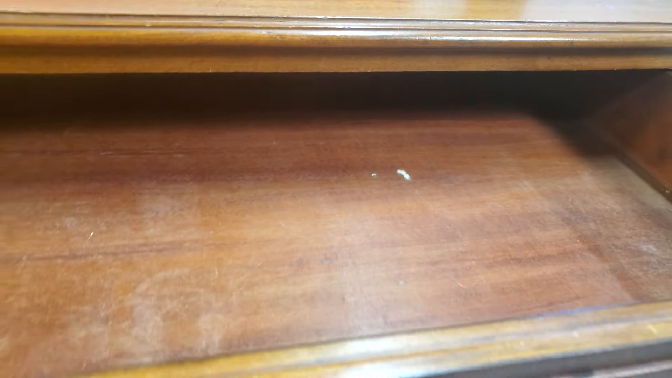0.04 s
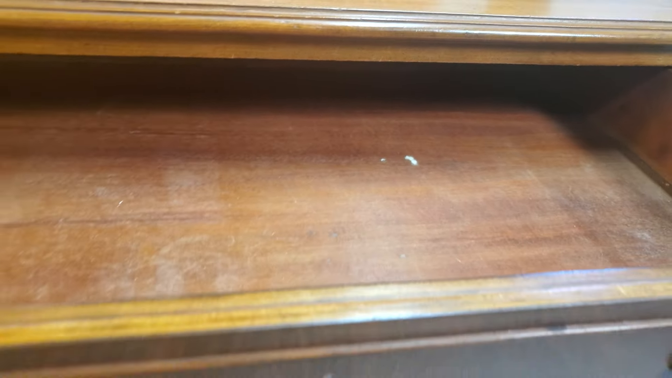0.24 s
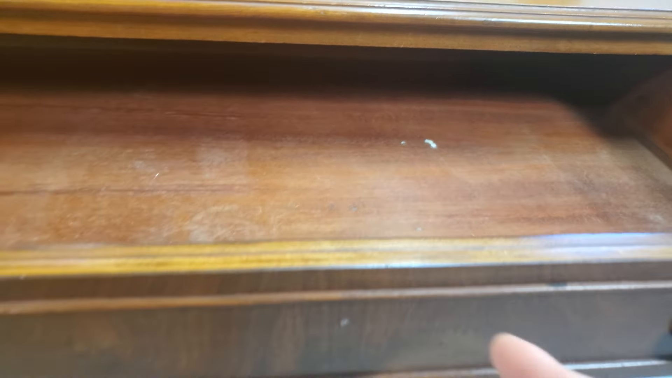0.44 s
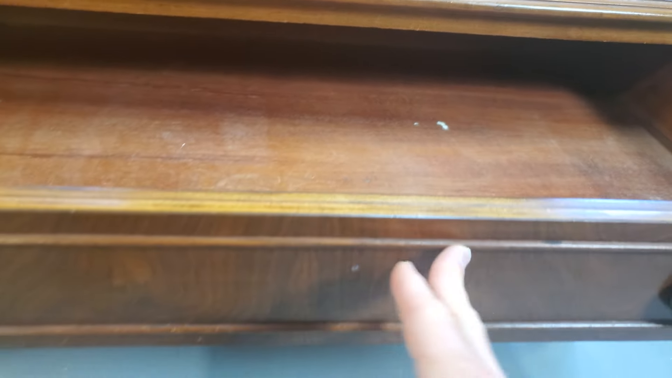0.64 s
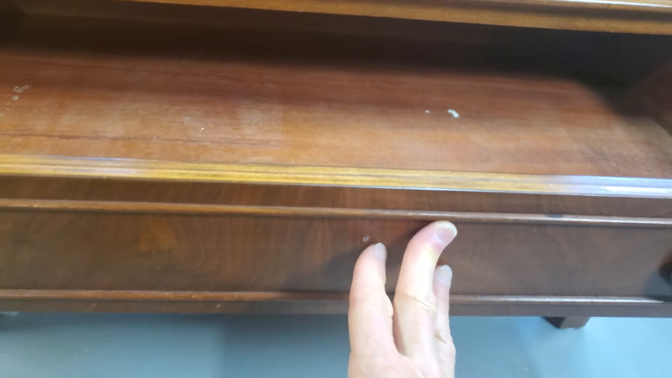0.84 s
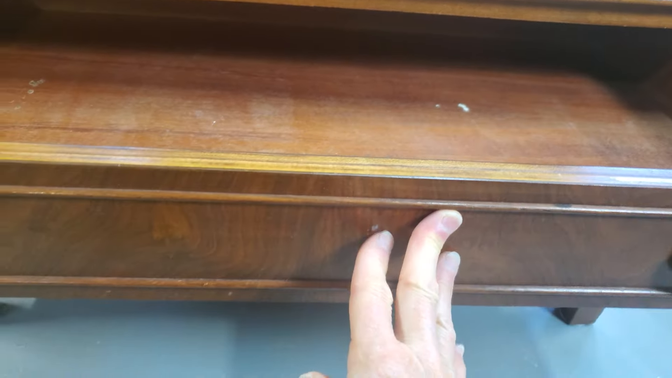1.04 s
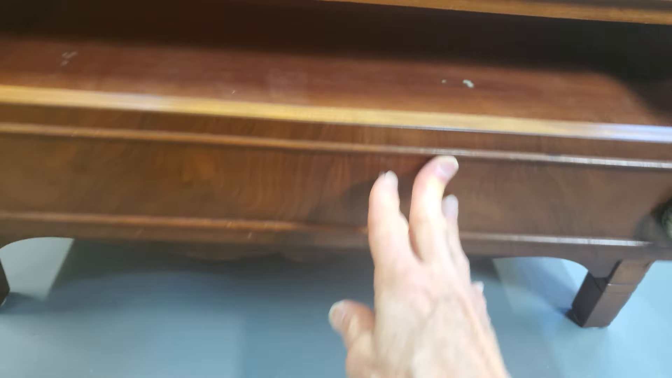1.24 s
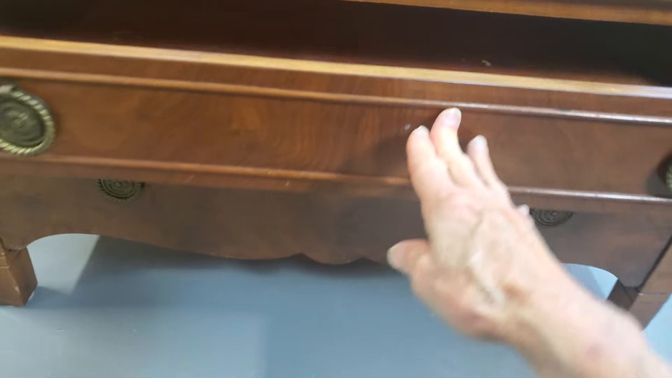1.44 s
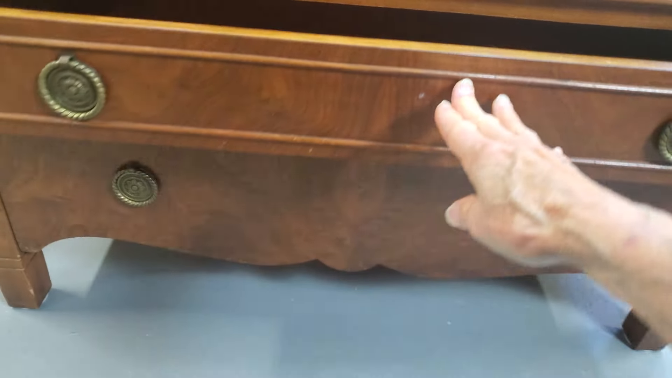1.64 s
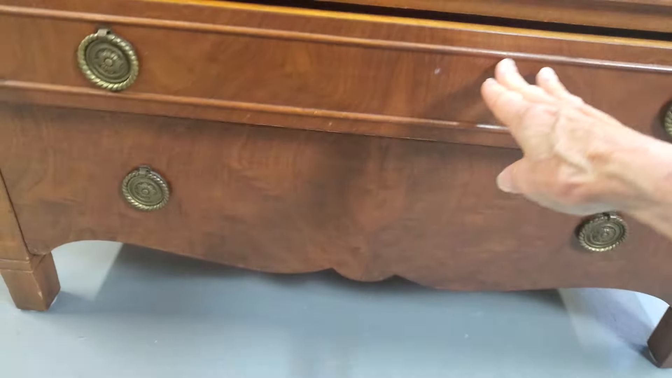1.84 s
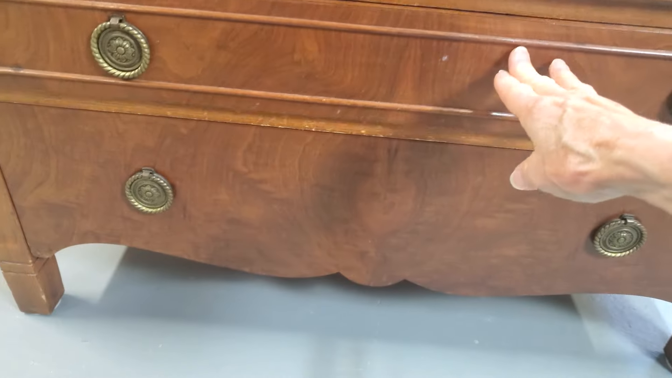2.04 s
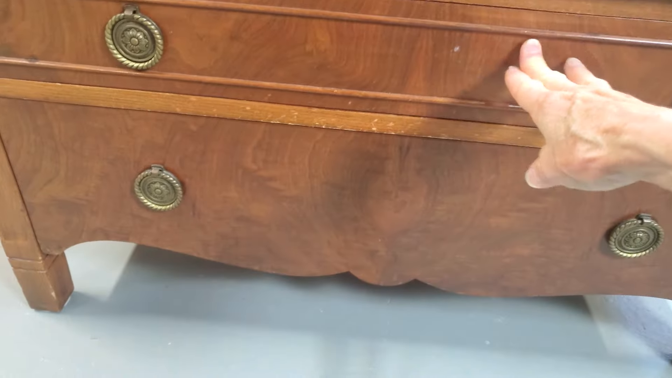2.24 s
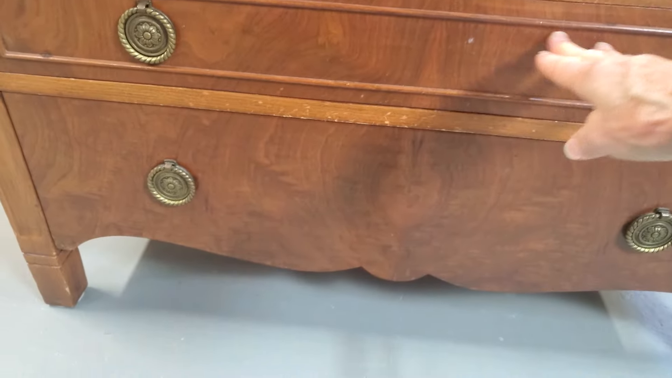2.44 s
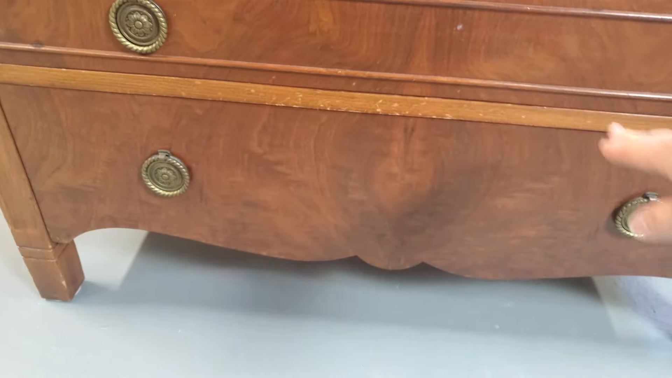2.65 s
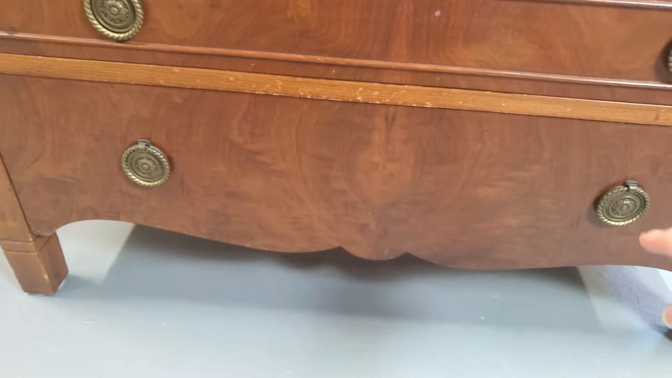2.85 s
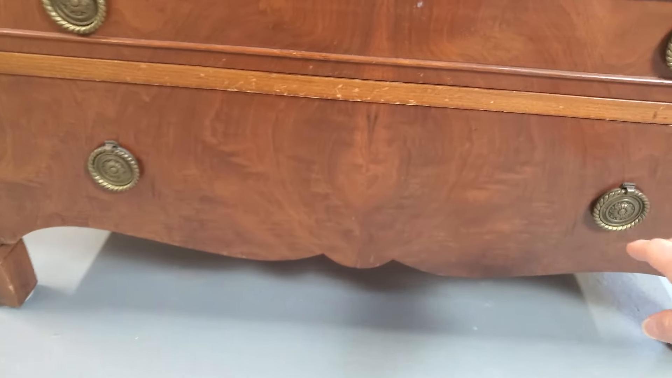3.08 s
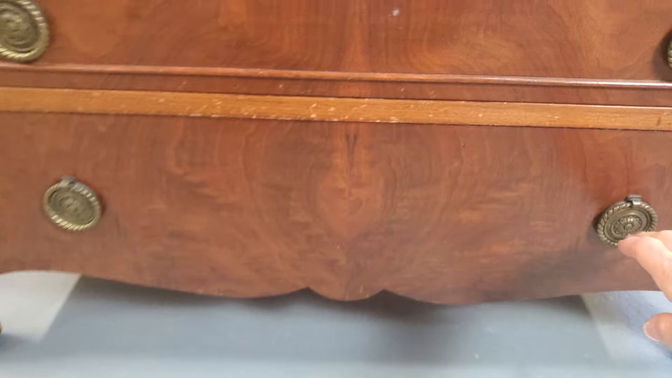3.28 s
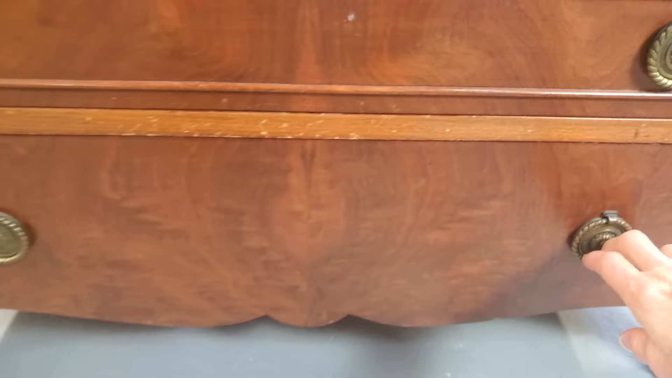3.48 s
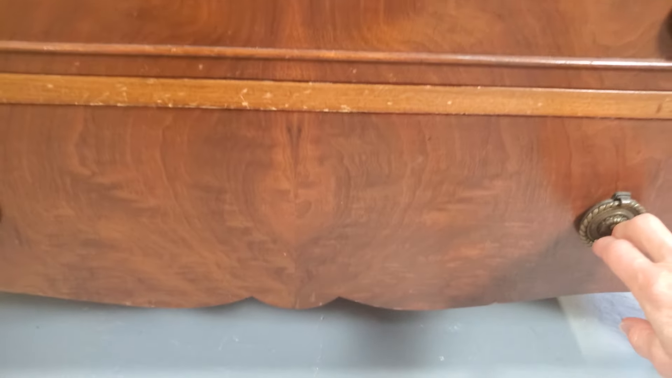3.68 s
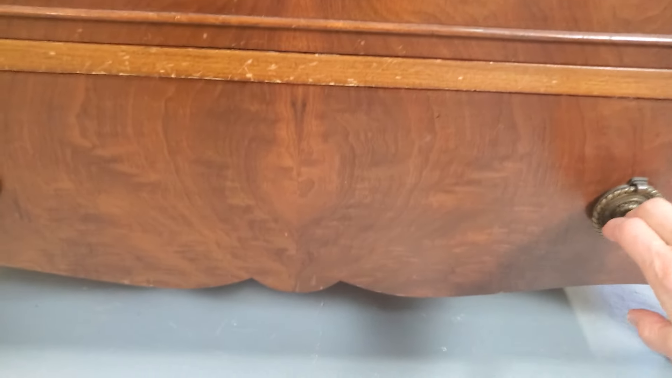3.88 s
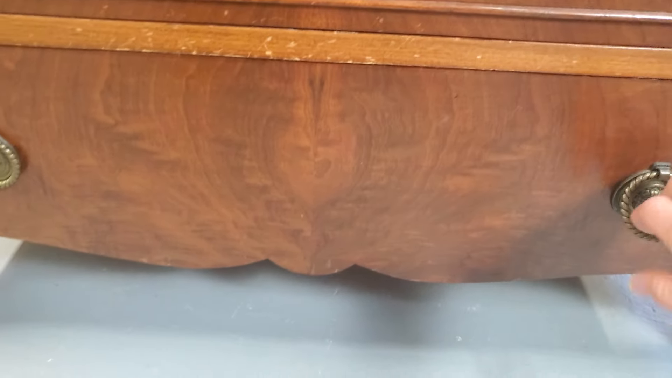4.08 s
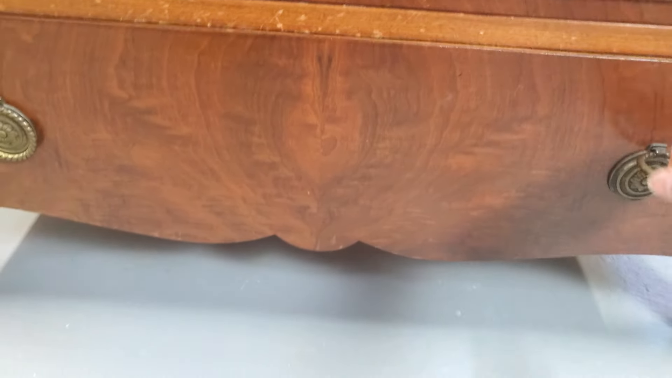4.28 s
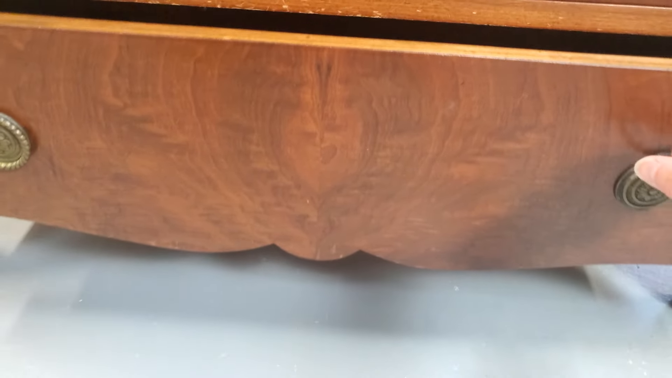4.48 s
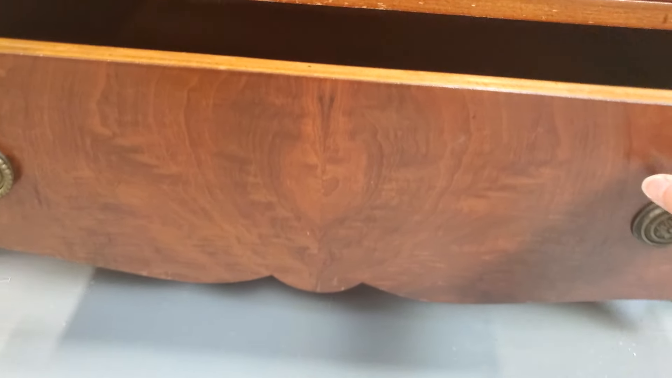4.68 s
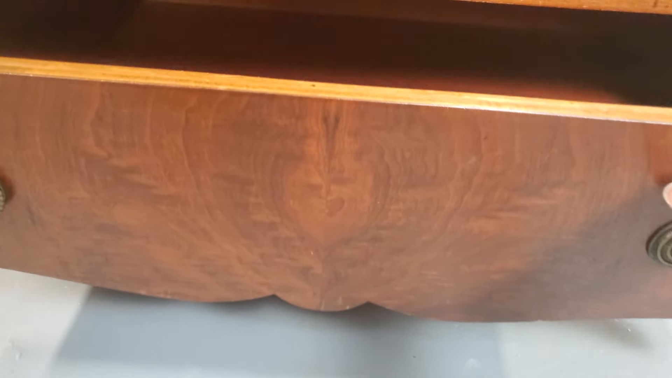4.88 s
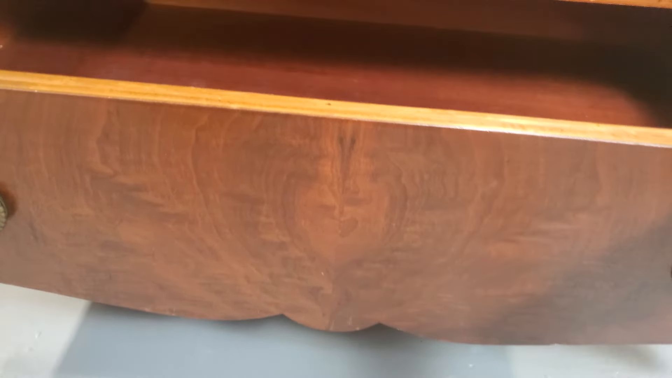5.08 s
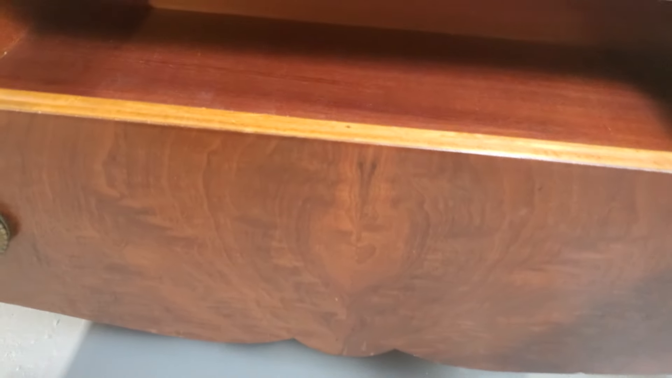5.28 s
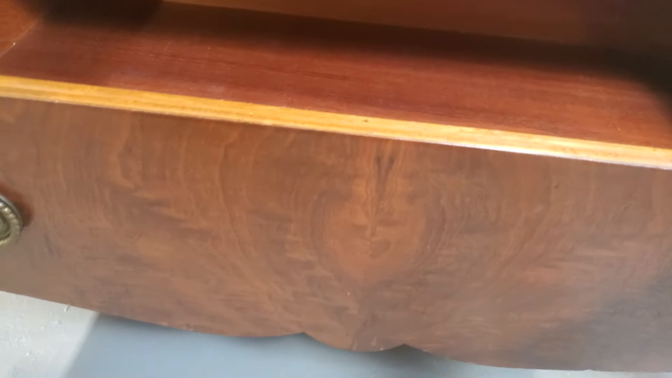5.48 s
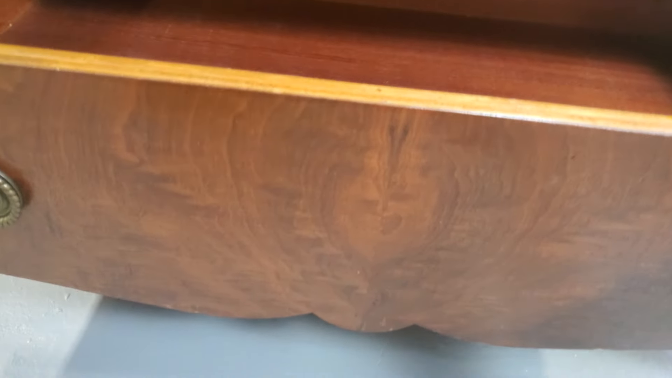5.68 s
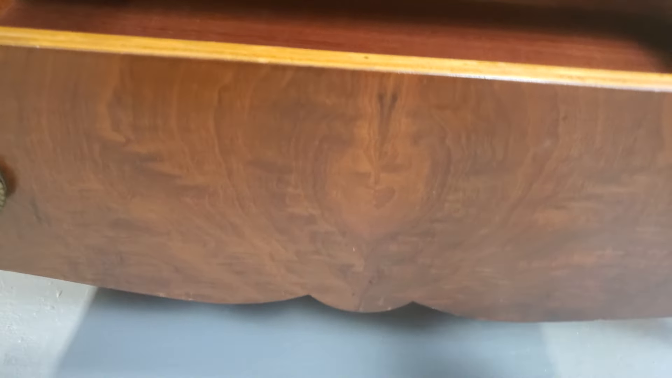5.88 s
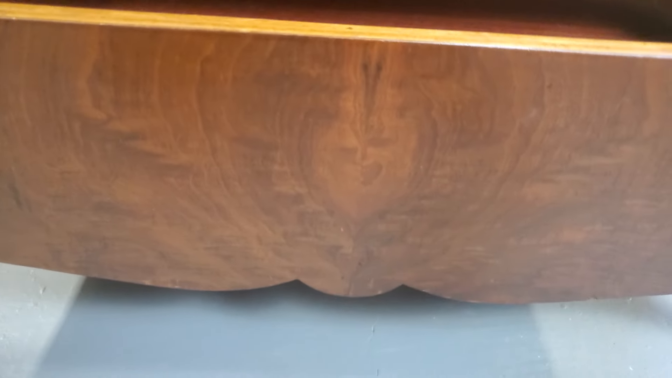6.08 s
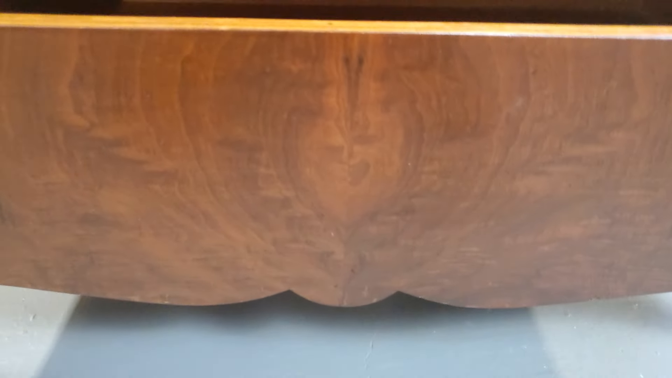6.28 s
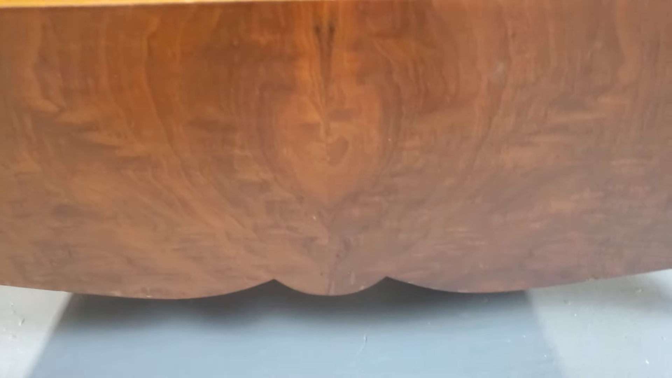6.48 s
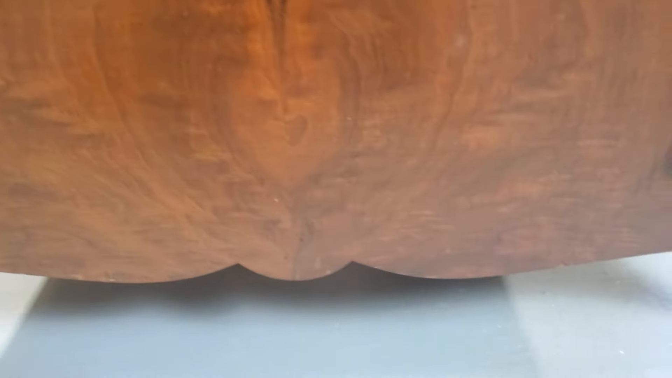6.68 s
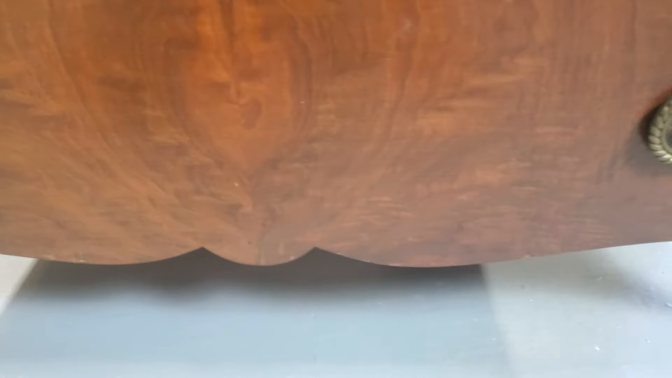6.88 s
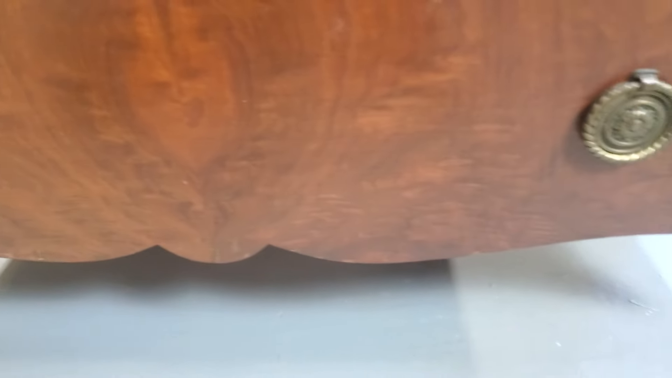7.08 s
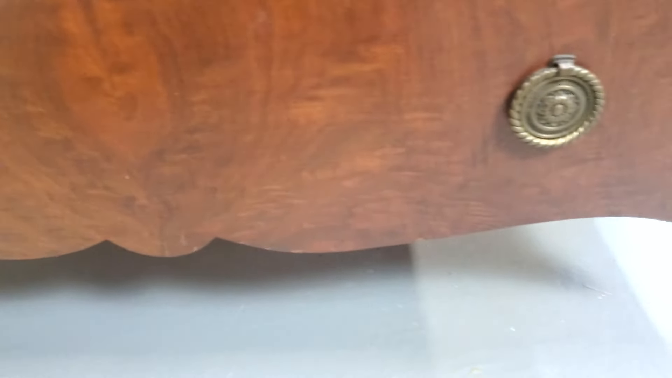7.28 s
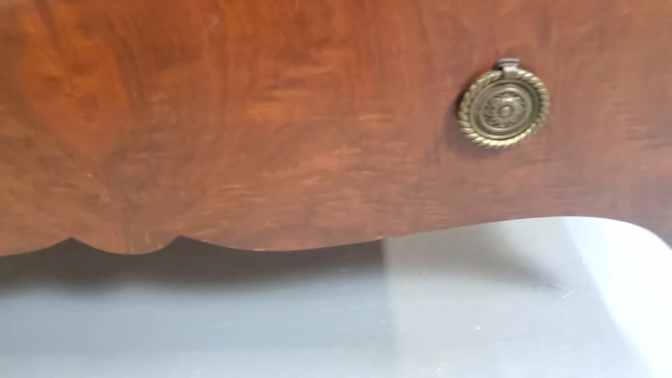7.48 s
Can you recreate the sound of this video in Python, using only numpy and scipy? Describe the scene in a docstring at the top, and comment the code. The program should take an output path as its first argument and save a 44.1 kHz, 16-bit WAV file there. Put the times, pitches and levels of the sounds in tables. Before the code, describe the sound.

Close by in a quiet room, an old wooden drawer scrapes inward with hollow, booming knocks and bright clacks of brass ring pulls. After a short lull, fingers tick against a lower pull, that drawer jerks and rumbles out, and loose fittings clatter sharply. Soft cloth and shoe scuffs and a dull heel thump follow.

```python
"""Faint room tone comes first, then small wooden shudders and light clacks as a drawer of an old chest is pushed in.
The runners slip and shake the hollow carcass, while dry wood hisses on wood and brass ring pulls clack on plates.
Fingers then feel for the lower pull, that drawer is pulled out, and loose fittings clatter hard.
Near the end, clothes and shoes rub and a soft heel thumps. Wood and brass are ringing modes driven by clicks;
rubbing is coloured grains. All is heard from close by in a quiet room."""
import sys
import numpy as np
from scipy import signal
from scipy.fft import rfft, irfft, next_fast_len
from scipy.io import wavfile

SR = 44100
rng = np.random.default_rng(int(sys.argv[2]) if len(sys.argv) > 2 else 0)


def unload_wav(signal):
    """Save mono or channel-first audio to the path in sys.argv[1] as 16-bit WAV at rate SR, clipped to [-1, 1]."""
    wavfile.write(
        sys.argv[1],
        SR,
        np.round(np.clip(np.atleast_2d(signal).T, -1, 1) * 32767).astype(np.int16),
    )


N = 332073

# The two strokes, push in and pull out, one list each:
# time_s, boom_db, panels_db, drone_db (drawer bottom), hiss_db, hiss_top_db
STROKES = [
    [(1.118, -43, -40, -50, -45, -56), (1.2, -44, -47.5, -61, -48.5, -47.5),
     (1.26, -39.5, -42, -57, -41, -45), (1.37, -35, -44.5, -54, -43, -45),
     (1.43, -42, -45.5, -51, -45, -56), (1.62, -21, -44.5, -57, -45, -51),
     (1.75, -23, -37, -35.5, -41, -57.5), (1.88, -37, -38.5, -47, -46, -60),
     (1.94, -32.5, -43, -55, -48.5, -63), (1.97, -40.5, -45, -45, -38, -57),
     (2.03, -40, -48.5, -46.5, -45, -60), (2.12, -48.5, -60, -63, -57, -59.5),
     (2.25, -39, -55.5, -57, -60.5, -73.5), (2.47, -74.5, -77.5, -99, -83, -97)],
    [(4.3, -32, -54, -47, -56, -75), (4.33, -35, -44, -42, -46.5, -65), (4.37, -53, -50, -54, -54, -63),
     (4.57, -37, -55, -53, -51, -60), (4.65, -33, -48.5, -50, -45.5, -56),
     (4.76, -30.5, -45.5, -31.5, -45, -56.5), (4.91, -42.5, -73, -61.5, -56.5, -64.5),
     (4.97, -24.5, -57, -45, -44.5, -58.5), (5.03, -39, -64, -48, -45, -56.5),
     (5.16, -36.5, -56, -50, -48, -59), (5.39, -43, -58, -50.5, -48.5, -59),
     (5.45, -42.5, -64, -58.5, -56, -66), (5.52, -52, -78, -80, -80.5, -81)],
]
# Jolts that leave the chest shuddering: start_s, boom_db, panels_db, drone_db, t60_s (time to fall 60 dB)
JOLTS = [(0.699, -58.5, -77.5, -89, 1.4), (0.994, -50, -43.5, -58, 0.2), (1.12, -38.5, -35.5, -52.5, 0.25),
         (1.464, -12, -22.5, -29.5, 0.35), (1.577, -20.5, -35.5, -35.5, 0.4), (1.64, -31, -44, -39, 0.26),
         (1.931, -33, -50, -59, 0.42), (2.14, -41.5, -65, -60, 0.4), (2.444, -74.5, -69, -92, 0.27),
         (2.513, -43.5, -82.5, -75, 0.38), (3.377, -38, -80, -70, 1.05), (3.419, -36.5, -49.5, -61, 0.64),
         (3.526, -37, -51.5, -55.5, 0.4), (3.668, -48, -54, -56, 0.21), (3.774, -46, -58, -61, 0.36),
         (3.906, -45.5, -67.5, -75.5, 0.67), (3.8, -60, -58.5, -69.5, 0.38), (4.058, -68, -82, -60.5, 0.22),
         (4.1, -58, -73, -72, 1.9), (4.315, -21, -50.5, -41.5, 0.45), (4.665, -35.5, -47, -54, 0.36),
         (4.957, -14.5, -39.5, -32.5, 0.29), (5.498, -36, -72.5, -68.5, .3),
         (5.595, -41.5, -58, -60.5, 0.42), (5.74, -55, -52.5, -57.5, 1.8), (5.9, -64, -55, -52, 0.35),
         (5.941, -40.5, -54.5, -69, 0.55)]
# Ringing modes of the hollow carcass: pitch_hz, level_db (relative), t60_s
CARCASS = [(62, -12.5, 0.15), (81.8, 2, 0.15), (106, 4.5, 0.081), (166.5, -1, 0.14), (217.2, -2.5, 0.084),
           (282.2, -5.5, 0.13), (339.5, -13, 0.36)]
# Ringing modes of the drawer panels: pitch_hz, level_db (relative), t60_s
PANELS = [(406.5, -0.5, 0.094), (488, -6.5, 0.036), (541, -6, 0.06), (765, -5.5, 0.044), (870, -7.5, 0.061),
          (982, -6.5, 0.05), (1087, -8.5, 0.066), (1425, -8.5, 0.01), (1960, -13, 0.014)]
# Ringing modes of the thin drawer bottom: pitch_hz, level_db (relative), t60_s
BOTTOM = [(567, -0.5, 0.053), (640.5, -0.5, 0.057), (697, -3.5, 0.039)]
SLIPS_PER_S, JOLT_RISE_S = 250, 0.004
RADIATES_HZ = 57.65  # the chest moves little air below this

# Colour of dry wood rubbing: pitch_hz, level_db (per Hz, relative)
HISS = [(410, -31), (700, -4), (842, -8), (1320, -9), (1470, -5), (1990, -9.5), (2360, -6), (6200, -11.5),
        (7970, -29), (9600, -27.5), (15200, -32.5), (15900, -25.5), (16500, -43.5)]
# Fingers feeling for the lower pull: time_s, hiss_db, top_db
FINGERS = [(3.1, -95, -98), (3.3, -85, -86), (3.39, -68, -76), (3.45, -58, -72), (3.55, -58, -50),
           (3.59, -56, -58.5), (3.79, -63.5, -65.5), (3.88, -64.5, -72.5), (3.97, -78.5, -87.5),
           (4.19, -74, -75.5), (4.28, -66.5, -72)]
# Cloth and shoes scuffing: peak_s, hiss_db, top_db, swell_s, fade_s
SCUFFS = [(2.83, -81, -79, 0.085, 0.24), (6.17, -80, -73, 0.056, .15), (6.37, -51, -55.5, 0.31, 0.11),
          (6.62, -50, -53.5, 0.11, 0.075), (6.5, -71, -73, 0.022, 0.054), (6.825, -57, -59.5, 0.032, 0.096),
          (6.865, -58, -66.5, 0.12, 0.087), (6.91, -72, -86.5, 0.019, 0.045), (6.95, -74, -88, 0.046, 0.15),
          (7.271, -70, -79.5, 0.037, 0.44), (7.359, -71.5, -81.5, 0.14, 0.16), (7.5, -76.5, -95.5, .05, .1)]
GRAINS_PER_S, SCUFF_EDGE_DB = 5500, 30

# Wood meeting wood: start_s, peak_db
KNOCKS = [(0.879, -67), (0.994, -43), (1.121, -41), (1.339, -50), (1.472, -9), (1.58, -6.5), (1.719, -8),
          (1.785, -14.5), (2.449, -66.5), (2.515, -54.5), (3.384, -44), (3.782, -51), (3.91, -46),
          (4.325, -19.5), (4.649, -26), (4.96, -17.5), (5.505, -51)]
KNOCK_HARD_HZ = 1100  # a harder blow has a shorter push, about 1 / this

# Ring pulls of the upper drawer on their plates:
# start_s, mid_db, top_db, body_db, rattle_t60_s, ring_db (relative to mid_db), pitch_hz (rung most)
UPPER_CLACKS = [(0.862, -58, -61, -86, 0.16, -21, 6000), (0.8863, -55.5, -64, -83, 0.52, -28, 6000),
                (1.3604, -11.5, -25.5, -26, 0.14, -0.5, 5900), (1.373, -37, -27, -38, 0.21, -8, 11000),
                (1.5507, -14.5, -28.5, -31, 0.082, -12, 9000), (1.623, -28, -31.5, -47, 0.13, -13, 9000),
                (1.822, -30.5, -38.5, -34, 0.06, -18, 9000), (2.2503, -39, -39.5, -38, 0.053, -19.5, 6000),
                (2.2585, -22.5, -36, -48, 0.024, -5.5, 6000),
                (2.2747, -28.5, -60, -43.5, 0.082, -1.5, 2830), (2.779, -63, -80, -72.5, 0.052, -12, 4020),
                (2.8168, -51.5, -63.5, -76.5, 0.096, -15, 4000)]
# Loose fittings of the lower drawer clattering:
# start_s, mid_db, top_db, body_db, rattle_t60_s, ring_db (relative to mid_db), pitch_hz (rung most)
LOWER_CLACKS = [(5.594, -14, -36, -36.5, 0.15, -5, 3500), (5.733, -35, -62.5, -44, 0.052, 8.5, 1607),
                (5.764, -30, -60.5, -41.5, .08, 3.5, 3500), (5.779, -35.5, -61.5, -31.5, 0.28, -2, 1845),
                (5.857, -34, -61, -40, 0.13, -11, 2970), (5.891, -8.5, -27.5, -28.5, 0.022, -2, 2194),
                (5.901, -10.5, -23.5, -31.5, 0.44, -6, 2450), (6.059, -48, -70, -57, .08, -7.5, 2850),
                (6.075, -19.5, -43, -47, 0.036, -1.5, 2450)]
# Fingers ticking a held, damped pull: start_s, mid_db, top_db, body_db
HELD_CLACKS = [(3.381, -38.5, -65, -52), (3.408, -25, -56, -50), (3.4318, -16, -29.5, -38),
               (3.5193, -17.5, -39.5, -33), (3.5494, -48, -45, -45), (3.5986, -47, -58, -44),
               (3.6585, -46, -59, -44), (3.694, -42, -65, -48), (3.735, -60, -70, -51),
               (3.908, -43, -65.5, -61), (4.061, -58, -84.5, -58.5), (4.2893, -35.5, -62, -38.5),
               (4.3221, -25, -49.5, -51), (4.9627, -27, -49, -35), (6.314, -53, -70, -69),
               (6.908, -60, -73, -44), (7.247, -60.5, -77, -75)]
HELD_T60_S, HELD_RING_DB, HELD_PITCH_HZ = 0.083, -8, 3150
# Ringing modes of the upper ring pull: pitch_hz, level_db (relative), t60_s
UPPER_PULL = [(2810, -5.5, 0.09), (4070, -18, 0.082), (4680, -20.5, 0.042), (6605, -2, 0.053),
              (8470, -10.5, 0.14), (9100, -19.5, 0.047), (11140, -7, 0.081), (13800, -18.5, 0.16),
              (15360, -5.5, .05), (16500, -8, .15), (15300, -12.5, 0.14)]
# Ringing modes of the lower drawer's fittings: pitch_hz, level_db (relative), t60_s
LOWER_PULL = [(697, -8, 0.051), (800, -1.5, 0.099), (1110, -10.5, 0.082), (1690, -10.5, 0.12),
              (2200, -4, 0.078), (2528, 2, 0.027), (2765, -7, 0.055), (2860, -6, 0.055), (2935, -6, .055),
              (3380, -1.5, 0.04), (3777, -8, 0.04), (4850, -6, 0.041), (5230, -16.5, 0.055),
              (5796, -7.5, 0.068), (6260, -1, 0.15), (15320, -28.5, .08)]
# Colour of the crack and rattle: pitch_hz, level_db (per Hz, relative)
CRACK = [(180, -47.5), (300, -16), (717, -10), (1830, -9), (2060, -4.5), (2790, -6), (3090, -4.5),
         (5550, 0), (7890, -10), (12600, -12.5), (14200, -16), (15700, -8), (16500, -26.5)]

# A soft heel on the floor: start_s, level_db, pitch_hz, t60_s
HEEL = [(6.624, -40.5, 80.5, 0.033)]

# Balance of the treble, before the right side is shaded: time_s, left_minus_right_db
PLACE = [(0.0, 6), (0.9, 4), (2.0, 2), (2.3, 7), (3.4, 5), (4.399, 2), (5.5, 2.5), (5.799, 6.5),
         (6.8, -1.5), (7.53, 12)]
PORT_SPLIT_HZ, SHADE_HZ, SCATTER_T60_S, BASS_LEFT_DB = 910, 10000, 0.066, 1.0
ROOM_T60_S, WALL_CUT_HZ, ROOM_DB = 0.35, 10000, -19.5
# Colour of the room tone: pitch_hz, level_db (per Hz, relative)
QUIET = [(8.8, -64.5), (15, -39.5), (48, 0.5), (71, -1), (90, -15.5), (124, -3.5), (152, -25), (298, -21.5),
         (325, -29), (476, -26), (677, -40), (1630, -40), (2120, -35), (2390, -44.5), (7000, -45),
         (8000, -51), (16500, -47.5)]
QUIET_DB = -65
# Mains hum, before a small trim and drift: pitch_hz, level_db
HUM = [(60, -88), (119, -79.5)]
MIC_LOW_HZ, CUTOFF_HZ = 58.1, 17150


def runners():
    """The carcass booms, the panels buzz and the drawer bottom drones under the slipping runners."""
    stroke_levels = in_time(STROKES)[:3]
    boom, panels, drone = np.sqrt(stroke_levels ** 2 + shudders())
    out = boom * shaken(CARCASS, SLIPS_PER_S)
    out += panels * shaken(PANELS, 3 * SLIPS_PER_S)
    return out + drone * shaken(BOTTOM, 3 * SLIPS_PER_S)


def shudders():
    """Power of boom, panels and drone after the jolts: a quick rise, then a steady fall, for up to 1 s."""
    power = np.zeros((3, N))
    for start_s, *levels_db, t60 in JOLTS:
        at = round(start_s * SR)
        t = np.arange(min(N - at, SR)) / SR
        rise = np.minimum(t / JOLT_RISE_S, 1)
        fall = amp(-60 * np.maximum(t - JOLT_RISE_S, 0) / t60)
        power[:, at:at + SR] += (amp(levels_db)[:, None] * rise * fall) ** 2
    return power


def shaken(modes, per_s):
    """Stick-slip jerks, dealt afresh to each mode, keep the wood ringing; unit rms."""
    out = np.zeros(N)
    for hz, db, t60 in modes:
        jerks = grains(per_s, spread_db=3.5)
        out += amp(db) * rms_one(ring(jerks, hz, t60))
    return rms_one(out)


def rubbing():
    """Dense fibre grains under slightly flickering pressure; a wide source, so two separate draws."""
    power = in_time(STROKES)[3:] ** 2 + in_time([FINGERS]) ** 2 + scuffs()
    hiss, bright = np.sqrt(power)
    fibres = np.array([grains(GRAINS_PER_S, spread_db=0.5) for side in range(2)])
    grit = colour(fibres, HISS)
    low = rms_one(band(grit, 900, 7300))
    top = rms_one(band(grit, 9000, 18500))
    flicker = amp(1.2 * drift(30))
    return flicker * (hiss * low + bright * top)


def scuffs():
    """Power of hiss and top as cloth and shoes rub: each scuff swells from and fades to an edge 30 dB down."""
    power, t = np.zeros((2, N)), np.arange(N) / SR
    for peak_s, hiss_db, top_db, swell_s, fade_s in SCUFFS:
        # 0 at the peak, 1 at either edge
        away = np.where(t < peak_s, (peak_s - t) / swell_s, (t - peak_s) / fade_s)
        levels_db = np.array([[hiss_db], [top_db]])
        power += amp(levels_db - SCUFF_EDGE_DB * np.minimum(away, 5)) ** 2
    return power


def knocks():
    """A blow is a short rounded push into all the wooden modes."""
    modes = CARCASS + [(hz, db - 7.5, t60) for hz, db, t60 in PANELS + BOTTOM]
    push = np.hanning(int(SR / KNOCK_HARD_HZ) + 3)
    force = np.zeros(SR // 2)
    force[:len(push)] = push / push.sum()
    out = np.zeros(N)
    for start_s, peak_db in KNOCKS:
        # each blow excites the modes a little differently
        strengths_db = rng.normal(0, 2, len(modes))
        blow = sum(amp(db + own_db) * ring(force, hz, t60)
                   for (hz, db, t60), own_db in zip(modes, strengths_db))
        at = round(start_s * SR)
        out[at:at + SR // 2] += (amp(peak_db) * blow / np.abs(blow).max())[:N - at]
    return out


def clacks(table, modes, chatter, crack_t60, tail_db, rise_s, off_pitch_db):
    """A crack and a dying rattle in three bands; the chattering contact drives the brass modes.

    chatter is the contact's t60 as a share of the rattle's t60. Modes weaken by off_pitch_db
    for each octave away from the pitch rung most."""
    grit = colour(grains(9000, spread_db=4.5), CRACK)
    edges_hz = [(1539, 6000), (9600, 18500), (411.6, 1710)]  # mid, top, body
    bands = [rms_one(band(grit, *edges)) for edges in edges_hz]
    touches = rms_one(grains(1500, spread_db=2.5))
    strengths_db = rng.normal(0, 2.0, (len(table), len(modes)))
    mode_hz = np.array(modes)[:, 0]
    t = np.arange(SR // 4) / SR  # each clack lasts at most a quarter second
    rise = 1 - np.exp(-t / rise_s)
    out = np.zeros(N + SR)
    for (start_s, mid_db, top_db, body_db, t60, ring_db, pitch_hz), own_db in zip(table, strengths_db):
        at = round(start_s * SR)
        span = slice(at, at + len(t))
        crack = amp(-60 * t / crack_t60)
        rattle = amp(tail_db - 60 * t / t60)
        for noise, db in zip(bands, (mid_db - 6.5, top_db, body_db)):
            out[span] += amp(db) * rise * (crack + rattle) * noise[span]
        force = rise * amp(-60 * t / (chatter * t60)) * touches[span]
        own_db = own_db - off_pitch_db * np.abs(np.log2(mode_hz / pitch_hz))
        brass = sum(amp(db + extra_db) * ring(force, hz, decay)
                    for (hz, db, decay), extra_db in zip(modes, own_db))
        out[span] += amp(mid_db + ring_db) * brass / np.abs(brass).max()
    return out[:N]


def heel():
    """One dull thump, a few cycles of a low sine that holds briefly and then dies away."""
    start_s, db, hz, t60 = HEEL[0]
    t = np.maximum(np.arange(N) / SR - start_s, 0)
    level_db = db - 60 * np.maximum(t - .02, 0) / t60
    return amp(level_db) * np.sin(2 * np.pi * hz * t)


def ports(pair):
    """Both microphone ports hear much the same bass; treble reaches the shaded right one duller and scattered."""
    time_s, pan_db = np.transpose(PLACE)
    pan_db = np.interp(np.arange(N) / SR, time_s, pan_db)
    bass = twice(pair, PORT_SPLIT_HZ, "low")
    treble = twice(pair, PORT_SPLIT_HZ, "high")
    # a short burst of fading noise smears the right treble
    t = np.arange(SR // 20) / SR
    scatter = rng.standard_normal(len(t)) * amp(-60 * t / SCATTER_T60_S)
    scatter /= np.sqrt(np.sum(scatter ** 2))
    shaded = signal.fftconvolve(treble[1], scatter)[:N]
    shaded = signal.sosfilt(signal.butter(1, SHADE_HZ, fs=SR, output="sos"), shaded)
    # keeps the treble power while it moves
    both = amp(0.15) * np.sqrt(4 / (1 + amp(-2 * pan_db)))
    treble = both * np.array([treble[0], shaded * amp(-0.5 - pan_db)])
    return bass * amp([[BASS_LEFT_DB / 2], [-BASS_LEFT_DB / 2]]) + treble


def room(x):
    """Echoes from six feedback delays a side with dull walls, worked out on a padded frequency grid."""
    size = next_fast_len(N + SR)
    w = 2 * np.pi * np.fft.rfftfreq(size)
    wall = 1 / np.sqrt(1 + (w * SR / (2 * np.pi * WALL_CUT_HZ)) ** 2)
    lags = rng.uniform(.008, .035, (2, 6, 1)) * SR  # in samples
    loop = wall * amp(-60 * lags / SR / ROOM_T60_S) * np.exp(-1j * w * lags)
    echoes = (loop / (1 - loop)).sum(axis=1)
    return irfft(rfft(x, size) * echoes, size)[:, :N]


def room_tone():
    """Distant rumble, mains hum and faint hiss; similar in the bass, far less alike in the treble."""
    mid, side = colour(rng.standard_normal((2, N)), QUIET)
    side_treble = signal.sosfilt(signal.butter(1, 900, "high", fs=SR, output="sos"), side)
    side = amp(-12) * side + side_treble
    t = np.arange(N) / SR
    hum = sum(amp(db - 1.0 + 2.5 * drift(3)) * np.sin(2 * np.pi * hz * t) for hz, db in HUM)
    return amp(QUIET_DB) * (mid + side * [[1], [-1]]) + hum


def amp(db):
    """Decibels to gain."""
    return 10 ** (np.asarray(db) / 20)


def rms_one(x):
    """Scale to unit rms."""
    return x / np.sqrt(np.mean(x ** 2) + 1e-20)


def in_time(tables):
    """Level columns of curve tables as gains at every sample; practically silent outside each table."""
    quiet = [-120] * (len(tables[0][0]) - 1)
    rows = []
    for table in tables:
        before, after = table[0][0] - .008, table[-1][0] + .012
        rows += [[before, *quiet], *table, [after, *quiet]]
    rows = np.array(rows)
    t = np.arange(N) / SR
    return amp([np.interp(t, rows[:, 0], column) for column in rows[:, 1:].T])


def colour(x, spectrum):
    """Shape the spectrum by a table of dB per Hz; unit rms."""
    hz, db = np.transpose(spectrum)
    grid = np.maximum(np.fft.rfftfreq(N + 1, 1 / SR), 1)
    gain = amp(np.interp(np.log(grid), np.log(hz), db))
    return rms_one(irfft(rfft(x, N + 1) * gain, N + 1)[..., :N])


def band(x, low_hz, high_hz):
    """Keep the sound between two pitches."""
    return signal.sosfilt(signal.butter(3, [low_hz, high_hz], "band", fs=SR, output="sos"), x)


def twice(x, hz, kind):
    """A low- or high-pass applied twice; the low and high halves add up flat."""
    sos = signal.butter(2, hz, kind, fs=SR, output="sos")
    return signal.sosfilt(sos, signal.sosfilt(sos, x))


def drift(rate_hz):
    """Slow random wandering with unit rms."""
    r = np.exp(-2 * np.pi * rate_hz / SR)
    noise = rng.standard_normal(N + SR)
    return rms_one(signal.lfilter([1], [1, -2 * r, r * r], noise)[SR:])


def ring(force, hz, t60):
    """A unit click sets a sine of height about 1 ringing and dying away."""
    r, w = amp(-60 / (t60 * SR)), 2 * np.pi * hz / SR
    return signal.lfilter([0, np.sin(w)], [1, -2 * r * np.cos(w), r * r], force + 1e-18)


def grains(per_s, spread_db):
    """Random clicks of uneven size and sign."""
    sizes = amp(spread_db * np.minimum(rng.exponential(1, N), 4))
    signs = rng.choice([-1, 1], N)
    return sizes * signs * (rng.random(N) < per_s / SR)


def scene():
    """Chest, hands, scuffs and heel, with their echoes and the room tone."""
    upper = clacks(UPPER_CLACKS, UPPER_PULL, chatter=.15, crack_t60=0.03, tail_db=-8.0,
                   rise_s=.0006, off_pitch_db=6.0)
    held_rows = [(*row, HELD_T60_S, HELD_RING_DB, HELD_PITCH_HZ) for row in HELD_CLACKS]
    held = clacks(held_rows, LOWER_PULL, chatter=0.14, crack_t60=0.019, tail_db=-15.0,
                  rise_s=0.00069, off_pitch_db=5.5)
    lower = clacks(LOWER_CLACKS, LOWER_PULL, chatter=1.0, crack_t60=0.043, tail_db=-12.5,
                   rise_s=0.0012, off_pitch_db=14.0)
    wood = twice(runners() + knocks(), RADIATES_HZ, "high")
    solid = wood + heel() + upper + held + lower
    shared, own = rubbing()
    pair = solid + np.array([shared, .5 * shared + 0.36 * own])
    far = signal.sosfilt(signal.butter(1, 200, "high", fs=SR, output="sos"), room(pair[0]))
    return ports(pair + amp(ROOM_DB) * far) + room_tone()


def record(dry):
    """The small microphone drops the deep bass; the top is cut steeply."""
    thin = signal.sosfilt(signal.butter(3, MIC_LOW_HZ, "high", fs=SR, output="sos"), dry)
    return signal.sosfilt(signal.cheby2(14, 80, CUTOFF_HZ, fs=SR, output="sos"), thin)


dry = scene()
out = record(dry)
unload_wav(out)
```